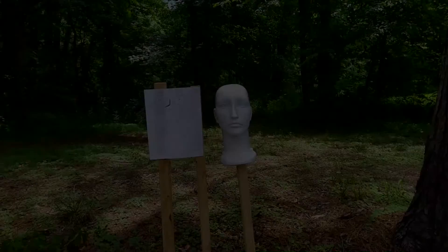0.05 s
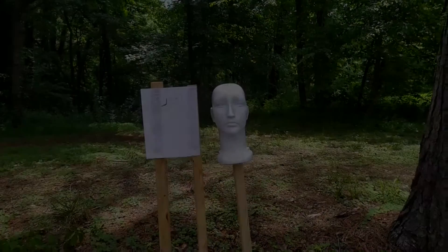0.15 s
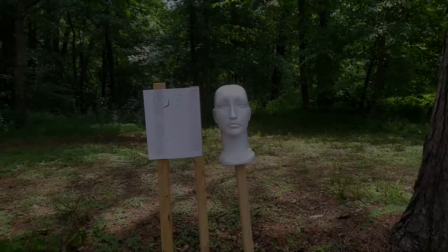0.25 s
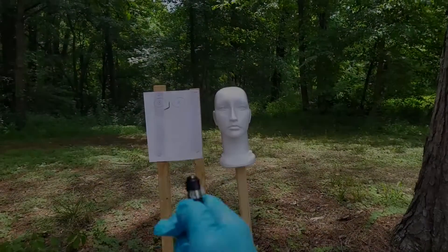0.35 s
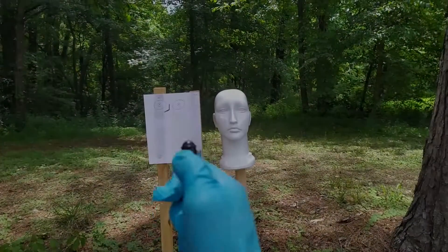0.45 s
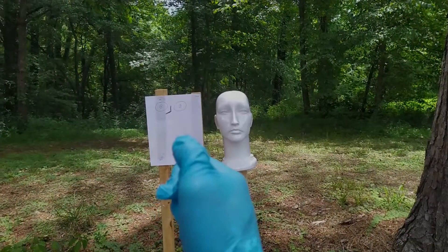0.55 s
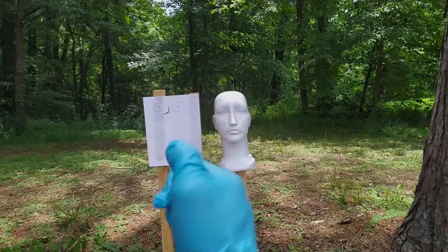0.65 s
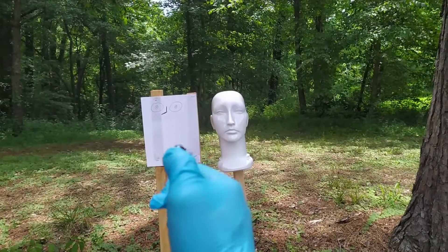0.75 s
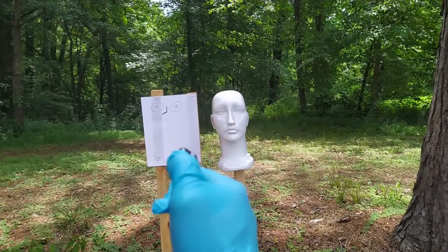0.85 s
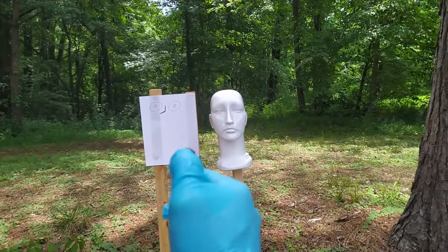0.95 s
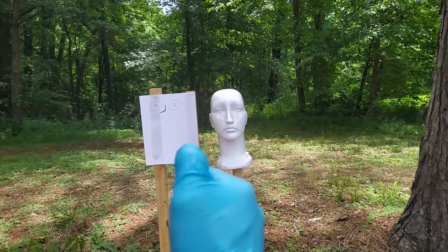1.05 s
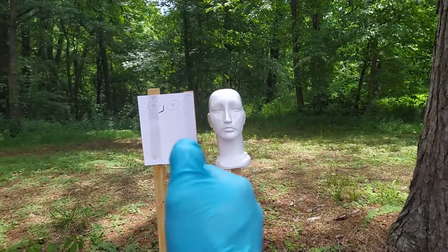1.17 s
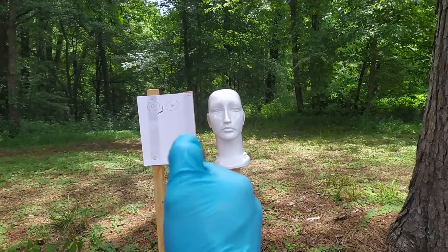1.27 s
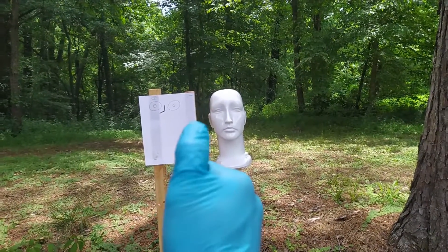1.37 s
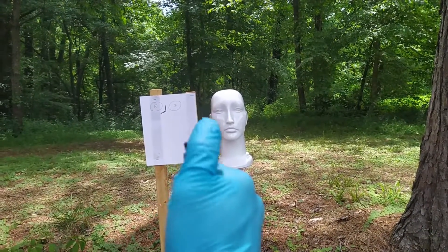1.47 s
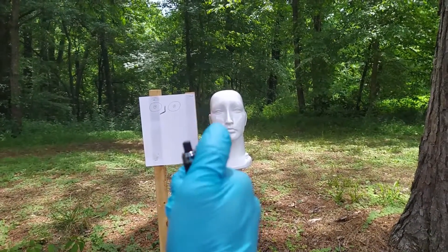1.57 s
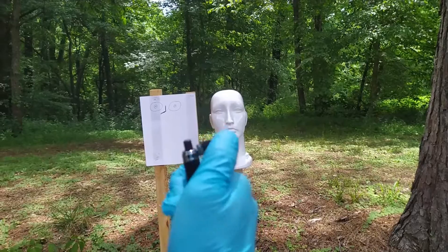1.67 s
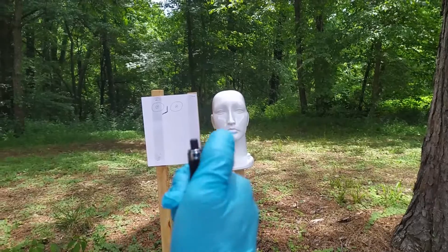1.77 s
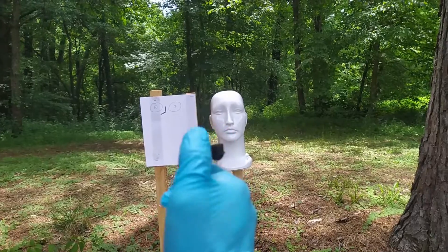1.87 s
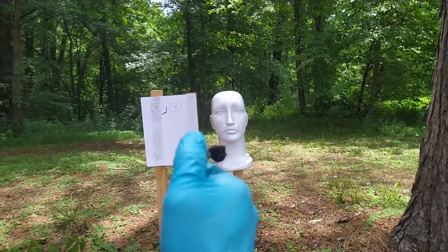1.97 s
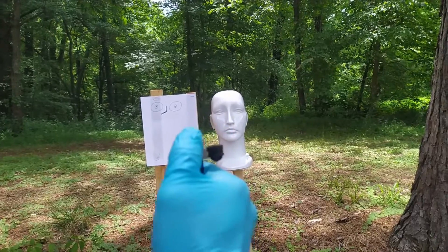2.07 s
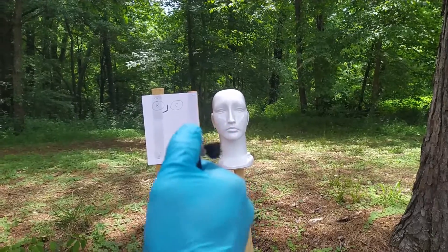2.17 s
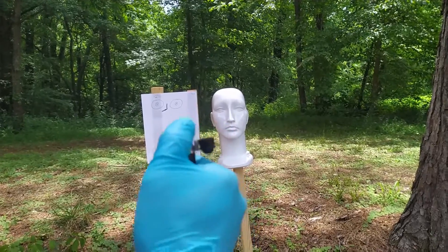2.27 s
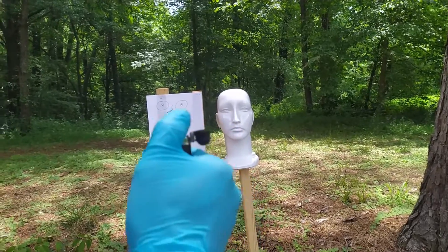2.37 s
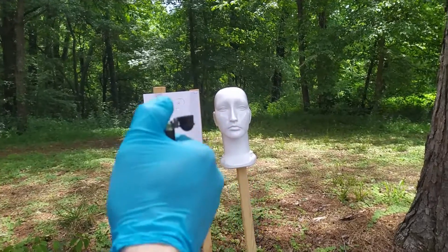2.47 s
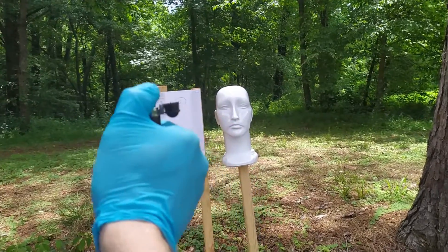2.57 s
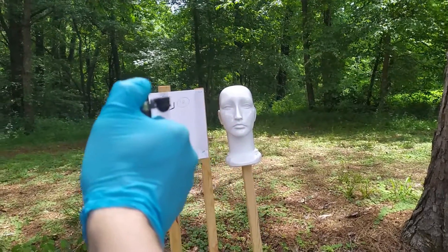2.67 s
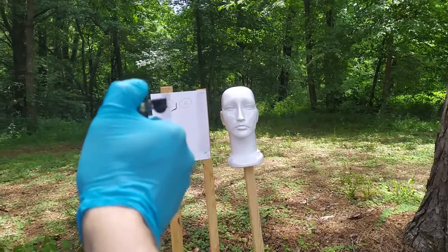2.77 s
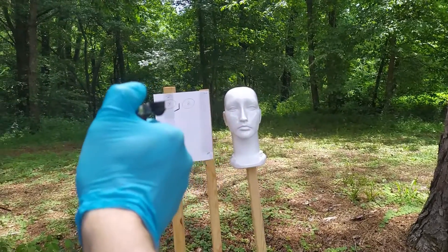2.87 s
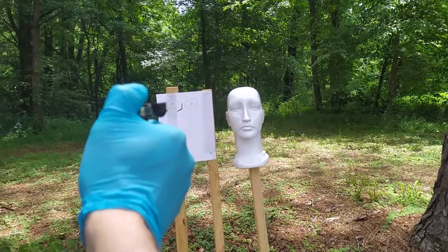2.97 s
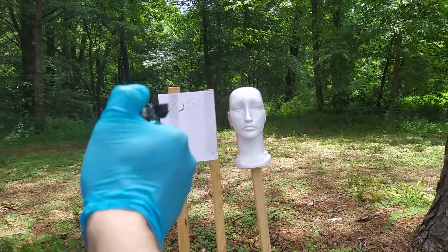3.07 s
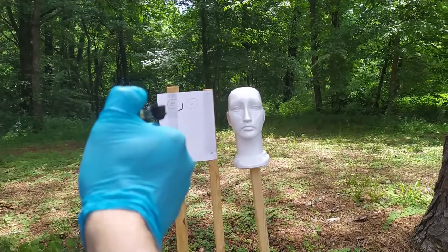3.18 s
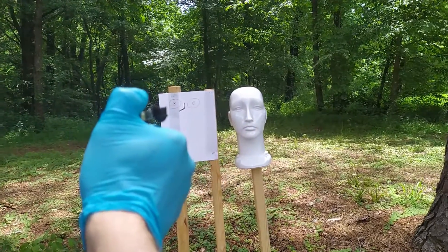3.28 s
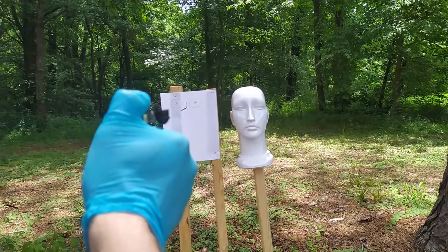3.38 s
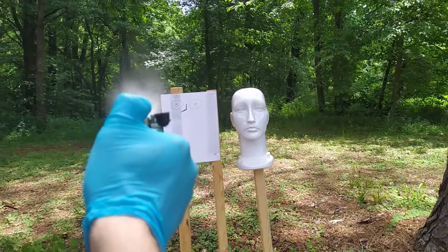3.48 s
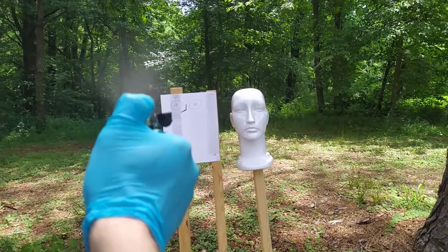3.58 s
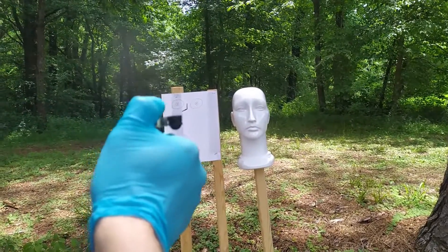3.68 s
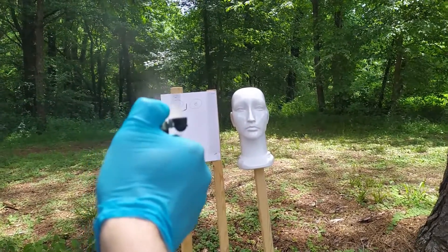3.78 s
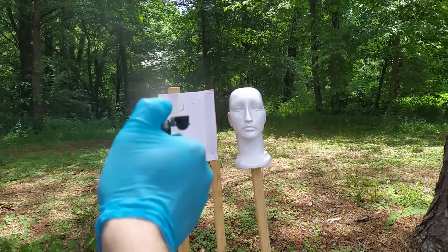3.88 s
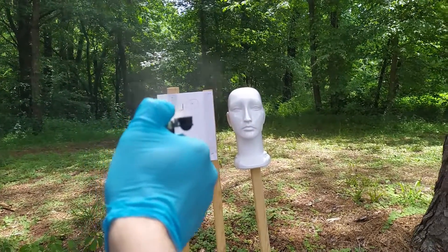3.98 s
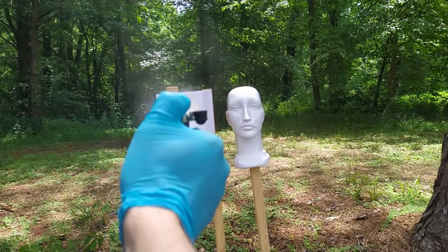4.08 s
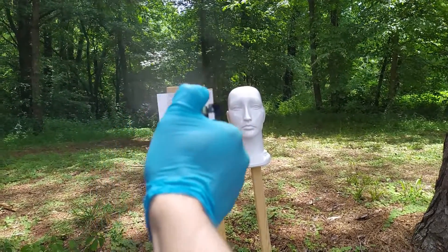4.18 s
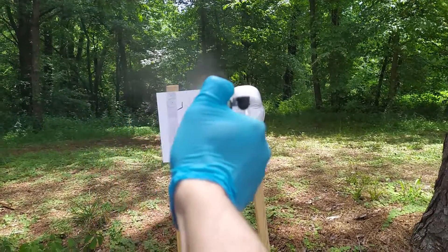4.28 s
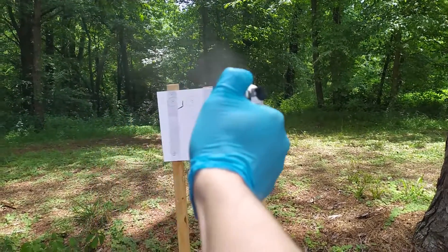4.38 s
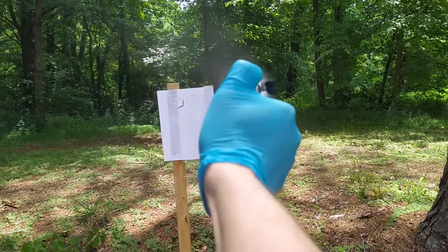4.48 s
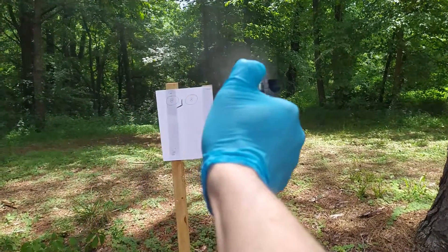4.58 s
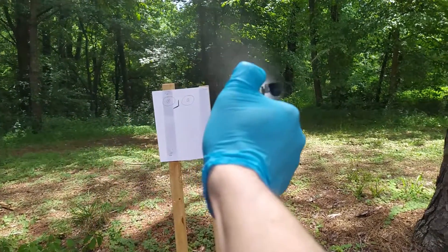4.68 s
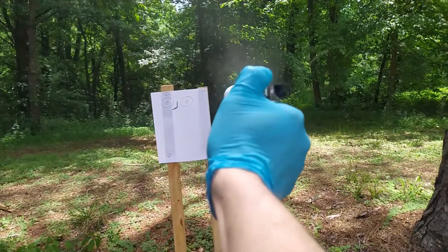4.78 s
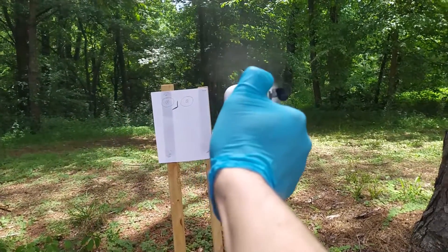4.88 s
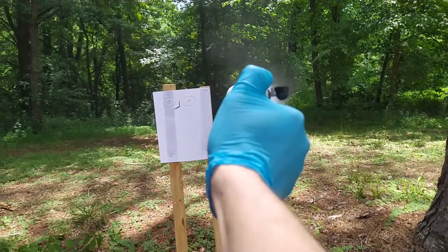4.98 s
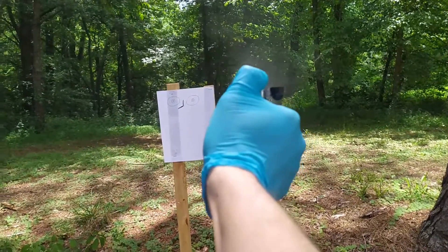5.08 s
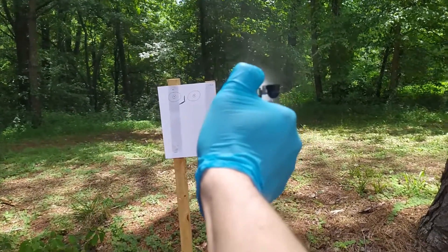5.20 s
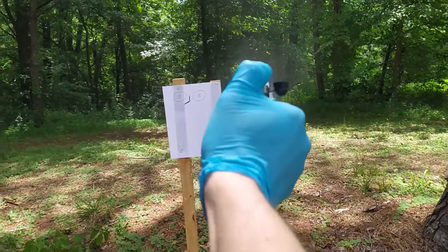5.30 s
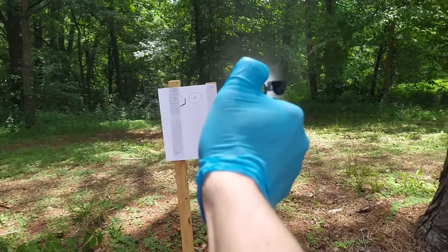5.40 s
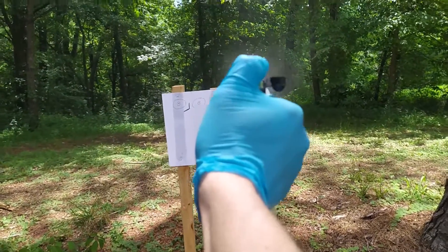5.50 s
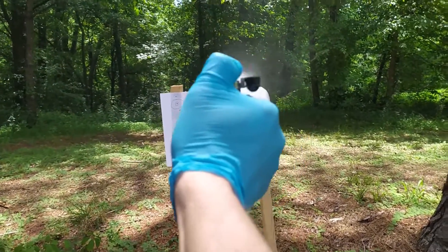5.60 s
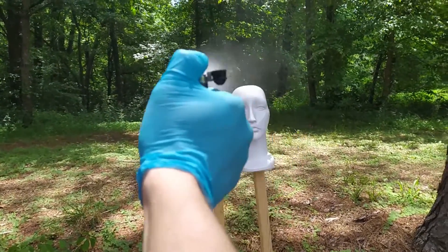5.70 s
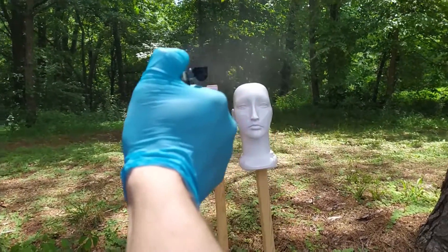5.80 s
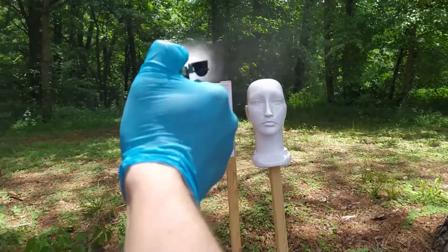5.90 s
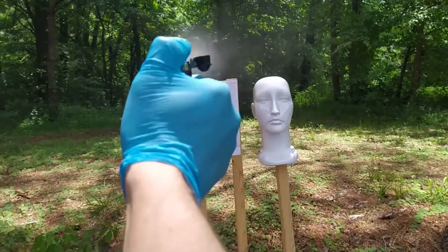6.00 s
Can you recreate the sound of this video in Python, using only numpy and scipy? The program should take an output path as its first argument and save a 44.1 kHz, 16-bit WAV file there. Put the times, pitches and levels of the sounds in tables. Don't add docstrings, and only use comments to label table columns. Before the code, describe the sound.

Small plastic ticks and a brief squeak, then a sharp spray burst followed by softer rhythmic hisses, with crickets, birds and a faraway engine hum.

```python
import sys
import numpy as np
from scipy import signal
from scipy.fft import rfft, irfft, next_fast_len
from scipy.io import wavfile
from scipy.ndimage import uniform_filter1d, map_coordinates

SR = 44100
rng = np.random.default_rng(int(sys.argv[2]) if len(sys.argv) > 2 else 0)


def invert_db(x):
    u = np.asarray(x, float) / 20
    return 10 ** u


def output_pcm(signal):
    pcm = np.clip(np.atleast_2d(signal).T, -1, 1) * 32767
    wavfile.write(sys.argv[1], SR, np.round(pcm).astype(np.int16))


N = 266805
T = np.arange(N) / SR
TOP_HZ = 15950


def unit(x):
    return x / np.sqrt(np.mean(x ** 2) + 1e-20)


def along(points, hz):
    f, v = np.transpose(points)
    return np.interp(np.log(hz + 1), np.log(f + 1), v)


def curves(rows, t=T):
    s, *cols = np.transpose(rows)
    return [np.interp(t, s, c) for c in cols]


def wobble(rate):
    return map_coordinates(rng.standard_normal(int(N * rate / SR) + 4), [T * rate])


def filtered(x, response):
    m = next_fast_len(N + 8192)
    return irfft(rfft(x, m) * response(np.fft.rfftfreq(m, 1 / SR)), m)[..., :N]


def panned(x, db):
    pair = np.array([invert_db(db / 2), invert_db(-db / 2)]).reshape(2, -1)
    return x * pair / pair.mean(axis=0)


def rush(spectrum, alike, patchy_db):
    z = signal.stft(rng.standard_normal((2, N)), nperseg=512)[2]
    field = uniform_filter1d(rng.standard_normal(z.shape[1:]), size=6, axis=0)
    field = uniform_filter1d(field, size=8, axis=1)
    pair = signal.istft(z * invert_db(patchy_db * unit(field)), nperseg=512)[1][:, :N]

    def response(hz):
        turn = np.arccos(np.clip(along(alike, hz), -1, 1)) / 2
        return invert_db(along(spectrum, hz)) * [np.ones_like(hz), np.tan(turn)]

    mid, side = filtered(pair, response)
    return np.array([mid + side, mid - side]) / mid.std()


def add(out, s, sound):
    spot = out[:, round(s * SR):][:, :sound.shape[-1]]
    spot += sound[..., :spot.shape[-1]]


def forest():
    # time in seconds, drone level in dB, leaves level in dB
    roar = [(0, -64, -72), (2.4, -62.5, -63), (3.72, -59, -63.5), (4.62, -64, -64.5), (6.05, -59, -66)]
    # frequency in Hz, level in dB per Hz
    drone_spectrum = [(18, -35), (30, -28), (65, -4.5), (85, -2), (108, -8.5), (140, -2.5), (185, -7.5),
                      (235, -10.5), (454, -21), (533, -21), (785, -23.5), (1400, -32.5), (1820, -49),
                      (3080, -120)]
    leaves_spectrum = [(530, -4), (900, -3), (1530, 1), (1850, 5.5), (2120, 0), (3820, -6.5), (4720, -9.5),
                       (5780, -6.5), (9000, -48), (11700, -86), (19800, -120)]
    air_spectrum = [(4120, -1.5), (6000, 0), (7300, 0.5), (8300, -1), (9950, 2.5), (11500, -6),
                    (14700, -3.5), (15600, -13), (16500, -41)]
    # frequency in Hz, left-right likeness
    alike = [(60, 0.97), (130, 0.86), (290, 0.83), (640, 0.61), (1410, 0.14), (3100, -0.028), (6820, -0.34),
             (15000, 0.19)]
    drone_db, leaves_db = curves(roar)
    drone = invert_db(drone_db + 8.0 + 1.76 * wobble(5.13)) * rush(drone_spectrum, alike, patchy_db=1.5)
    leaves = panned(rush(leaves_spectrum, alike, patchy_db=2.0), 3.3)
    leaves = invert_db(leaves_db + .8 * wobble(3.12)) * leaves
    air = invert_db(-69 + 0.13 * wobble(1.0)) * rush(air_spectrum, alike, patchy_db=5.5)
    return drone + leaves + air


def engine():
    # time in seconds, cycle rate in Hz
    speed = [(0, 16), (1, 16.6), (2, 17.25), (3, 17.8), (4, 18.3), (4.6, 18.52), (5.3, 18.62), (6.05, 18.6)]
    far_db = dict([(1, -43), (2, -28), (3, -13.5), (4, -9), (5, -4), (6, -18), (7, -14), (8, 0), (9, -53),
                   (10, -53), (11, -38), (12, -6.5), (13, -6), (14, -56), (15, -48), (16, -7), (17, -32),
                   (18, -32), (19, -29), (20, -22.5)])
    near_db = dict([(1, -37), (2, -27), (3, -11), (4, -1), (5, 0), (6, -30), (7, -2), (8, 0), (9, -13),
                    (10, -11), (11, -15), (12, -10), (13, -13), (14, -16), (15, -19), (16, -16), (17, -28),
                    (18, -16), (19, -20), (20, -22), (21, -30), (22, -23), (23, -17), (24, -33), (25, -30),
                    (26, -15), (27, -34), (28, -32)])
    # multiple, level in dB far off, abreast and turned away
    strong = [(5, -51, -47.5, -48), (7, -57, -47, -49.5), (8, -45.5, -47, -51.5), (13, -58, -57, -84)]
    # time in s, multiple, half width in s, change in dB
    nulls = [(1.83, 5, 0.73, -13), (0.7, 7, 0.18, 4), (2.5, 7, 0.56, -11.5), (2.24, 13, 0.062, -17),
             (6.2, 8, 0.12, -8), (8, 7, 0.12, -11), (3.87, 8, 0.46, 3.5), (4.73, 8, 0.17, -4.5),
             (1.02, 13, 0.23, 2.5), (0.31, 8, 0.16, -9.5), (1.13, 8, 0.21, -7.5), (0.26, 4, 0.67, -2),
             (0.34, 12, 0.22, -12)]
    cycle = 2 * np.pi * np.cumsum(curves(speed)[0]) / SR
    near = np.clip((T - 1.32) / 1, 0, 1)
    away = np.clip((T - 3.94) / 0.62, 0, 1)
    level = {}
    for k in near_db:
        path_db = (1 - near) * far_db.get(k, -40) + near * near_db[k] - 51.5
        away_db = -12.5 * away * (k > 9)
        level[k] = path_db + away_db + 1.85 * wobble(2.924)
    for k, far, by, past in strong:
        path_db = far + near * (by - far) + away * (past - by)
        lope_db = 2.5 * np.sin(cycle / 2 + wobble(1.5))
        level[round(k)] = path_db + .8 * wobble(3.5) + (1 - near) * (lope_db + 1.5 * wobble(12))
    for s, k, half_s, db in nulls:
        level[round(k)] = level[round(k)] + db * np.exp(-((T - s) / half_s) ** 2)
    hum = np.zeros(N)
    for k, db in level.items():
        phase = k * cycle + rng.uniform(0, 2 * np.pi) + 0.26 * wobble(6.5)
        hum += invert_db(db + 2.5 + 1.25 * wobble(8)) * np.sin(phase)
    return panned(hum, .5 + 0.63 * wobble(4.05))


def insects():
    # start of a chirp in seconds, peak level in dB
    chirps = [(0.094, -64), (0.398, -62.5), (0.685, -65), (0.9223, -66), (1.1513, -65.5), (1.6877, -64),
              (2.002, -64), (2.3116, -63), (2.6873, -61.5), (2.9961, -62.5)]
    # frequency in Hz, width in Hz, beats a second, beat depth 0-1, level in dB
    chorus = [
        (10200, 120, 3.6, 0.1, -80.5),
        (8040, 110, 1.49, 0.6, -78.5),
        (14800, 900, 45, .6, -86),
        (5700, 180, 2.2, .4, -83),
    ]
    out, t = np.zeros((2, N)), np.arange(round(.063 * SR)) / SR
    strokes = np.sin(np.pi * t / .009) ** 2 * invert_db(-70 * t)
    for s, db in chirps:
        add(out, s - .003, panned(invert_db(db + 5.5) * strokes * np.sin(2 * np.pi * 9920 * t), 5.1))
    for hz, width, beat, depth, db in chorus:
        band = filtered(rng.standard_normal((2, N)), lambda f: np.exp(-((f - hz) / width) ** 2))
        depth = np.clip(depth, 0, 1)
        pulse = 1 - depth + depth * np.cos(np.pi * beat * T) ** 6
        out += invert_db(db + wobble(0.98)) * unit(band * pulse)
    return out


def far_bird():
    # start in seconds, length in seconds, start pitch in Hz, held pitch in Hz, level in dB
    whistles = [(1.9, .18, 2550, 2700, -69), (2.34, .2, 2100, 2740, -67.5), (2.81, .19, 2200, 2740, -63),
                (3.185, .03, 2100, 1980, -66), (2.11, .05, 3150, 3330, -72), (2.592, .08, 3150, 3300, -68),
                (3.068, .1, 3150, 3320, -71), (4.915, .04, 5350, 5300, -65), (5.09, .05, 6000, 5900, -66),
                (5.14, .03, 5400, 5450, -66), (5.36, .04, 5900, 5850, -64), (5.89, .03, 6300, 6200, -66)]
    out = np.zeros((2, N))
    for s, length, start_hz, held_hz, db in whistles:
        t = np.arange(round(length * SR)) / SR
        slide_hz = (held_hz - start_hz) * np.exp(-t / .017)
        hz = held_hz - slide_hz + 22 * wobble(90)[:len(t)]
        loudness = invert_db(db) * invert_db(2 * wobble(40)[:len(t)] + 2 - 25 * t) * signal.windows.tukey(len(t), .4)
        add(out, s, panned(loudness * np.sin(2 * np.pi * np.cumsum(hz) / SR), -2))
    return out


def trill():
    # start of a note in seconds, peak level in dB
    bird_notes = [(1.5779, -63), (1.6158, -62.3), (1.6531, -61.9), (1.6934, -59), (1.7314, -58),
                  (1.7714, -59), (1.8101, -57.5), (1.8471, -59), (1.885, -56), (1.923, -55),
                  (1.9616, -57.0), (1.9995, -56), (2.0363, -54), (2.0737, -56), (2.1114, -55),
                  (2.1525, -56), (2.1895, -59), (2.2283, -58), (2.2667, -59.7), (2.3041, -56),
                  (2.3402, -56), (2.379, -57.5), (2.4205, -57), (2.46, -54), (2.4985, -54), (2.537, -54),
                  (2.578, -53), (2.6171, -54), (2.6555, -54.3), (2.6923, -52), (2.7306, -54), (2.7686, -53),
                  (2.805, -53), (2.8423, -53.4), (2.883, -50), (2.92, -52), (2.9577, -51.5), (2.9956, -51),
                  (3.0329, -53), (3.0714, -51), (3.1101, -51), (3.15, -50.5), (3.1874, -53), (3.2273, -51),
                  (3.2668, -50), (3.3058, -50.5), (3.344, -51), (3.3853, -51), (3.4263, -50), (3.4648, -51),
                  (3.5035, -66)]
    out, t = np.zeros((2, N)), np.arange(round(.014 * SR)) / SR
    u = t / t[-1]
    for s, db in bird_notes:
        bend = 1 + .012 * rng.standard_normal()
        hz = (6720 - 1400 * u ** 1.4) * bend
        note = np.sin(np.pi * u) * np.sin(2 * np.pi * np.cumsum(hz) / SR)
        add(out, s + .0005, panned(invert_db(db + .5) * note, 2.5))
    return out


def ticks():
    # time in seconds, peak level in dB, ring in Hz, left-right difference in dB
    knocks = [(0.669, -47, 8500, 2), (0.6744, -55, 8040, -1), (0.6885, -40, 9400, 22),
              (0.6911, -41, 3250, 4), (0.7365, -39, 8750, 17), (0.8365, -36.5, 9050, 23),
              (0.8484, -60, 5370, 3.0), (1.278, -43, 4910, 10), (1.6254, -57, 6110, 3.0),
              (1.7738, -48, 6100, 2), (1.9156, -30.5, 7000, 18), (1.9432, -35, 6440, 11),
              (2.456, -42, 6070, 11), (2.635, -46, 6500, 23), (3.5232, -9.5, 6400, 5),
              (5.615, -44, 8000, 5.0), (5.635, -31, 9100, 10), (3.547, -13, 5550, 3)]
    out, t = np.zeros((2, N)), np.arange(300) / SR
    for s, db, hz, pan_db in knocks:
        ring = np.sin(2 * np.pi * hz * t) * invert_db(-60 * t / 0.0022)
        hard = .25 + .6 * (db > -15)
        crack = hard * rng.standard_normal((2, len(t))) * invert_db(-60 * t / .003)
        add(out, s, panned(invert_db(db) * (ring + crack), pan_db))
    return out


def glove():
    # time in seconds, slips a second, level in dB
    squeaks = [
        [(1.336, 2300, -58), (1.342, 3200, -50), (1.345, 2600, -46), (1.349, 2400, -60), (1.352, 2600, -45),
         (1.357, 3000, -49), (1.362, 2650, -52), (1.38, 2450, -62)],
        [(1.401, 2700, -48), (1.405, 2200, -49), (1.416, 2850, -41), (1.424, 3450, -46), (1.437, 4050, -47),
         (1.443, 4750, -45), (1.456, 4650, -49), (1.468, 5050, -48)],
        [(1.468, 5900, -54), (1.472, 5100, -49), (1.475, 5950, -43.5), (1.497, 6050, -49), (1.505, 6200, -58),
         (1.508, 7100, -60), (1.522, 7300, -66)],
        [(1.485, 3000, -52), (1.505, 3550, -55), (1.527, 4300, -67)],
        [(1.528, 5800, -48), (1.55, 6700, -55), (1.568, 7000, -70)],
    ]
    # start in seconds, end in seconds, level in dB
    rubs = [
        (1.334, 1.39, -63.5),
        (1.397, 1.46, -57.5),
        (1.46, 1.555, -60.5),
    ]
    # frequency in Hz, level in dB per Hz
    rubber = [(2000, -52), (3800, -20), (6000, -5), (8800, -9), (13000, 0), (16000, -21)]
    # frequency in Hz, level in dB
    cap = [(2400, -43), (3300, -15), (4100, -4), (5600, -1), (7200, -2.5), (9000, -7), (12000, -8),
           (14500, -5)]
    out = np.zeros((2, N))
    for rows in squeaks:
        t = np.arange(rows[0][0], rows[-1][0], 1 / SR)
        hz, db = curves(rows, t)
        slip = uniform_filter1d(rng.standard_normal((2, len(t))), size=70)
        jitter = uniform_filter1d(rng.standard_normal(len(t)), size=12)
        phase = 2 * np.pi * np.cumsum(hz * (1 + .14 * slip[0] + .09 * jitter)) / SR
        tone = np.zeros(len(t))
        for k in (1, 2, 3):
            tone += invert_db(along(cap, k * hz) - 8 * (k > 2)) * np.sin(k * phase) * (k * hz < TOP_HZ)
        grain = 1 + .26 * unit(uniform_filter1d(rng.standard_normal(len(t)), size=14))
        loudness = invert_db(db + 2 + 16 * slip[1]) * signal.windows.tukey(len(t), .12)
        add(out, t[0], panned(tone * loudness * grain, 3))
    stroke = np.zeros(N)
    for s, until, db in rubs:
        stroke += invert_db(db) * np.interp(T, [s, s + 0.008, until - 0.013, until], [0, 1, 1, 0])
    rub = stroke * invert_db(2.5 * wobble(250)) * rush(rubber, [(5000, .4)], patchy_db=5)
    return out + panned(rub, 3)


def can():
    # opens, fully open and shut in seconds, hiss in dB at full, sag in dB until closing
    jets = [(3.5215, 3.533, 3.67, -26, -3.2), (3.811, 3.834, 3.963, -28.8, -2.7),
            (4.038, 4.07, 4.188, -30, -3.6), (4.272, 4.3, 4.42, -32, -2),
            (4.487, 4.519, 4.635, -32.8, -1.5), (4.69, 4.724, 4.834, -33.2, -.6),
            (4.943, 4.975, 5.089, -36.2, .6), (5.173, 5.214, 5.316, -33.7, -2.5),
            (5.408, 5.454, 5.557, -33.2, -1), (5.548, 5.556, 5.65, -48.5, -17),
            (5.653, 5.7, 5.811, -32.6, -1.3), (5.94, 5.972, 6.08, -34, 2)]
    # frequency in Hz, level in dB per Hz
    hiss = [(210, -18.5), (350, -17), (815, -10), (1310, -8), (1810, -4.5), (2100, -5.5), (2370, -6.5),
            (2650, -7), (3000, -4.5), (3500, -4), (4900, -2), (6200, 1.5), (6800, 0.6), (7250, -3),
            (8300, 0.5), (10000, -5), (13000, -11.5), (15100, -7.5), (15800, -10.5)]
    # frequency in Hz, left-right difference in dB
    shade_db = [(60, 4), (99, -2), (160, -2), (270, 1), (450, 1), (740, -0.5), (1220, 7), (2010, 3.5),
                (3330, 11.5), (5500, 10.5), (9080, 3.5), (15000, 1)]
    # frequency in Hz, left-right likeness
    jet_alike = [(300, 0.99), (1000, 1), (1700, 0.94), (2600, 0.48), (4000, 0.25), (7000, 0.34),
                 (16000, 0.27)]
    mist_alike = [(8000, .2)]
    # time in seconds, top end left-right in dB, its likeness 0-1
    aim = [(3.52, 4, 0), (4.04, 6.5, 0), (4.3, 2, 0), (4.69, -2, 0.02), (6.05, -1.5, 0.6)]
    # time in seconds, mist in dB, finest hiss in dB
    nozzle_turn = [(3.52, -0.5, 1.5), (3.81, -1.5, 3), (4.04, 1.5, 2), (4.27, 0.5, 0), (4.49, 0.5, -2),
                   (4.69, 1, -2.5), (4.94, 1.5, -2), (5.17, 1, -4), (5.41, 1.5, -3), (5.65, 0, -1),
                   (5.94, 1, -1)]
    # time in seconds, lag in microseconds
    lag = [(3.52, 10), (4.05, 20), (4.3, 70), (4.7, 120), (5.2, 140), (5.7, 130), (6.05, 100)]
    easy_db, brim_db = -34.5, -26.5
    sputter_s = .005

    flow = np.zeros((3, 2, N))
    alike, pressure_db, fine_db = np.zeros((3, N))
    for opens, full, shut, full_db, sag_db in jets:
        force_db, over_db = max(full_db - easy_db, 0), max(full_db - brim_db, 0)
        seated = shut - sputter_s
        closes = seated - 0.017 - 0.08 * over_db
        pan_db, like = curves(aim, opens)
        mist_db, fine_db[T > opens] = curves(nozzle_turn, opens)
        sputter = invert_db(-27) * np.exp(-np.clip(T - seated, 0, 1) / .009)
        opening = np.interp(T, [opens, full], [0, 1]) ** (.9 + .1 * force_db)
        closing = np.interp(T, [closes, seated], [1, 0]) ** 1.2
        valve = opening * np.maximum(closing, sputter)
        fall = np.clip((T - full) / (closes - full), 0, 1)
        gain = valve * invert_db(1.0 + full_db + fall * sag_db)
        low_gain = gain * invert_db(-4 - 0.61 * force_db)
        top_db = -0.7 + mist_db - 0.35 * force_db
        top_db = top_db - fall * (0.28 * max(sag_db, -6) + 0.96 * over_db)
        flow += [[gain, gain], [low_gain, low_gain], panned(gain * invert_db(top_db + 2.0), pan_db)]
        pressure_db[(T > opens) & (T < shut)] = over_db
        alike[T > opens] = np.clip(like, 0, 1)
    flow[2] += invert_db(-63.5) * (T > jets[0][1])

    eddies = invert_db(.6 * wobble(60) + 1.4 * wobble(1200))

    def shade(hz):
        notch = 1 - .35 * np.exp(-((hz - 2380) / 110) ** 2)
        return invert_db(np.outer([.5, -.5], along(shade_db, hz))) * notch

    def over(hz, edge_hz):
        return 1 / (1 + (edge_hz / (hz + 1)) ** 8)

    jet = eddies * filtered(rush(hiss, jet_alike, patchy_db=0.9), shade)
    jet[0] = map_coordinates(jet[0], [np.arange(N) - curves(lag)[0] * SR / 10 ** 6], order=5)
    low = filtered(jet, lambda hz: 1 - over(hz, 3030))
    body = jet - low - filtered(jet, lambda hz: over(hz, 8100))
    nozzle = filtered(body, lambda hz: np.exp(-((hz - 6100) / 900) ** 2))
    body += (invert_db(0.32 * pressure_db) - 1) * nozzle
    top = filtered(eddies * rush(hiss, mist_alike, patchy_db=1.8), lambda hz: over(hz, 8500))
    top = np.sqrt(alike) * unit(top[0]) + np.sqrt(1 - alike) * top / top.std(axis=1, keepdims=True)
    top = top / np.sqrt((1 + alike) / 2)
    top += (invert_db(fine_db - 0.5) - 1) * filtered(top, lambda hz: over(hz, 11800))
    top += (invert_db(16.0 * pressure_db) - 1) * filtered(top, lambda hz: over(hz, 12400))
    body, low = body / body.mean(axis=0).std(), low / low.mean(axis=0).std()
    return flow[0] * body + flow[1] * low + flow[2] * top


def trees(x):
    # frequency in Hz, time to fall 60 dB in seconds
    decay = [(300, .4), (3000, .45), (8000, .55), (15000, .6)]
    hz, t, z = signal.stft(rng.standard_normal((2, SR // 2)), SR, nperseg=256)
    tail = signal.istft(z * invert_db(-60 * t / along(decay, hz)[:, None]), SR, nperseg=256)[1]
    return signal.fftconvolve(x, tail / np.linalg.norm(tail[0]), axes=1)[:, :N]


def scene():
    far = engine() + forest() + insects()
    birds = trill() + far_bird()
    hand = can() + ticks() + glove()
    echo = trees(invert_db(-31.5) * hand + invert_db(1.5) * birds)
    return hand + birds + echo + far


def band_limit(x):
    return signal.sosfilt(signal.butter(12, 17000, fs=SR, output="sos"), x)


def record(dry):
    mix = filtered(dry, lambda hz: np.clip((TOP_HZ - hz) / 250, 0, 1) ** 2)
    return band_limit(mix)


dry = scene()
out = record(dry)
output_pcm(out)
```